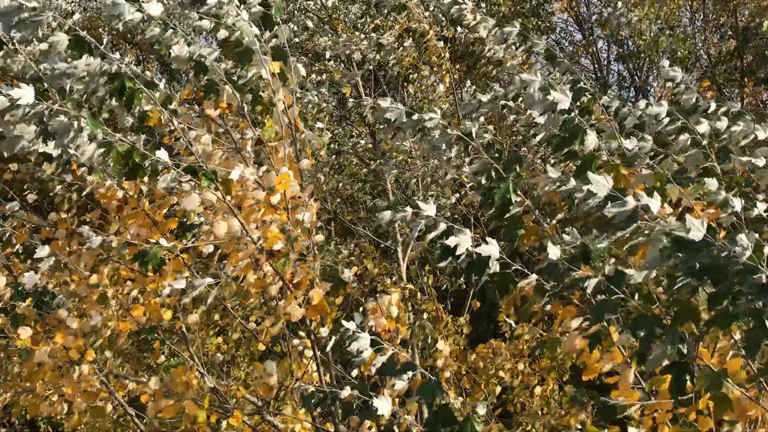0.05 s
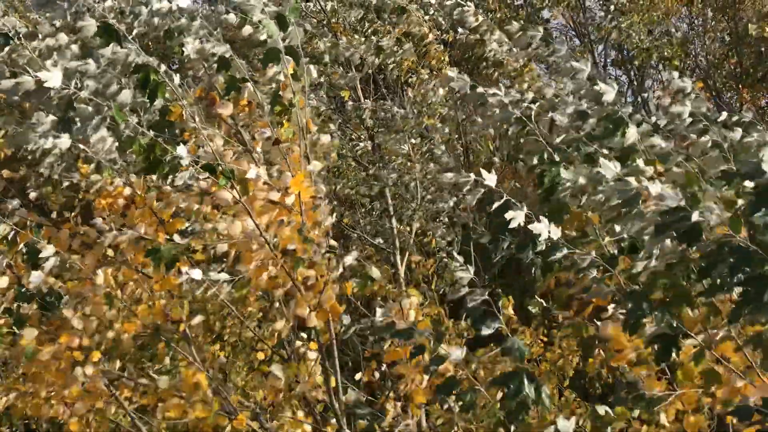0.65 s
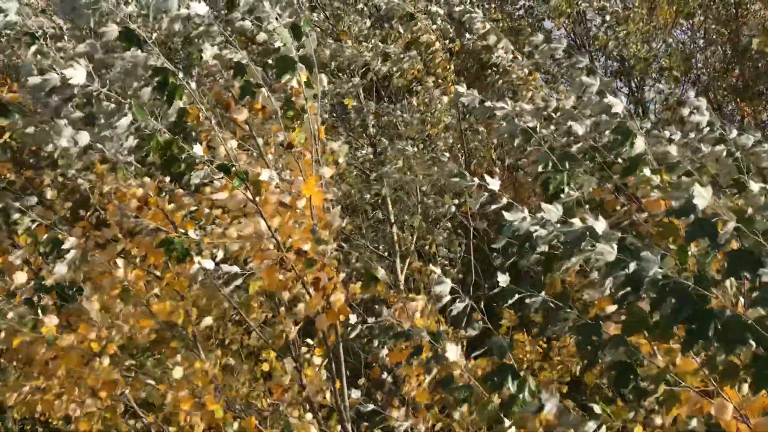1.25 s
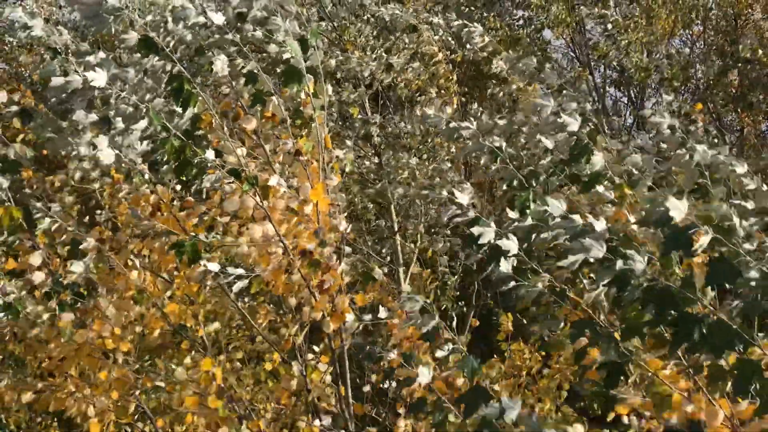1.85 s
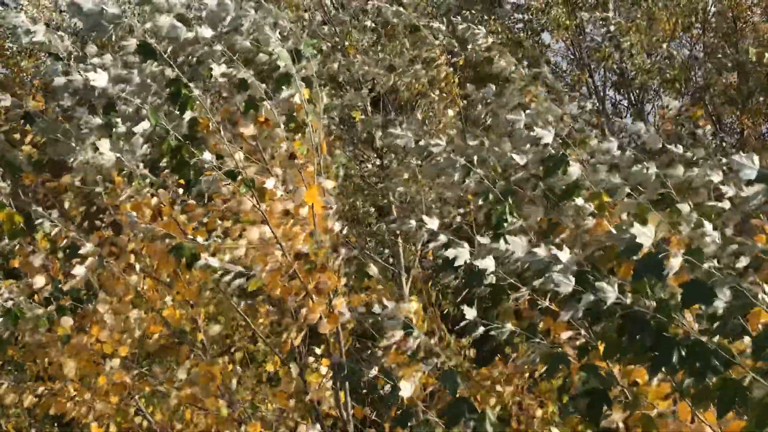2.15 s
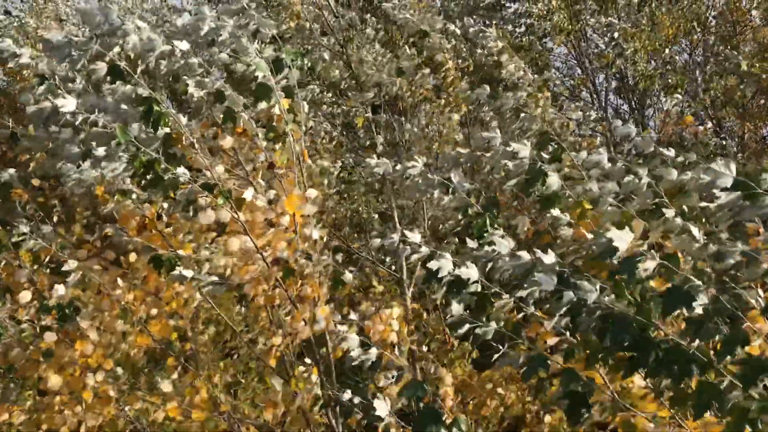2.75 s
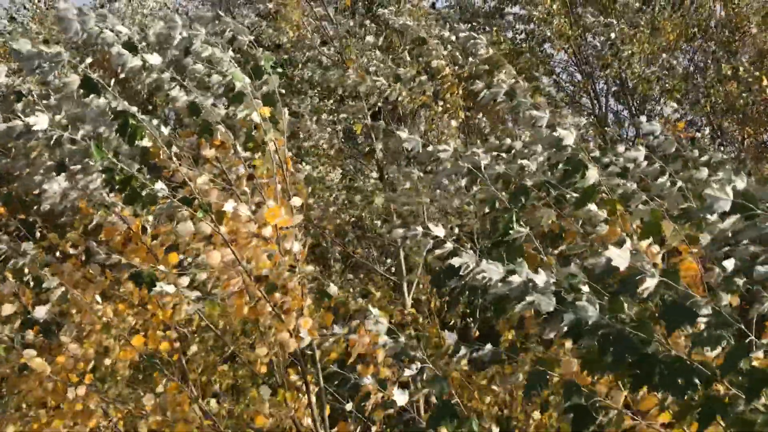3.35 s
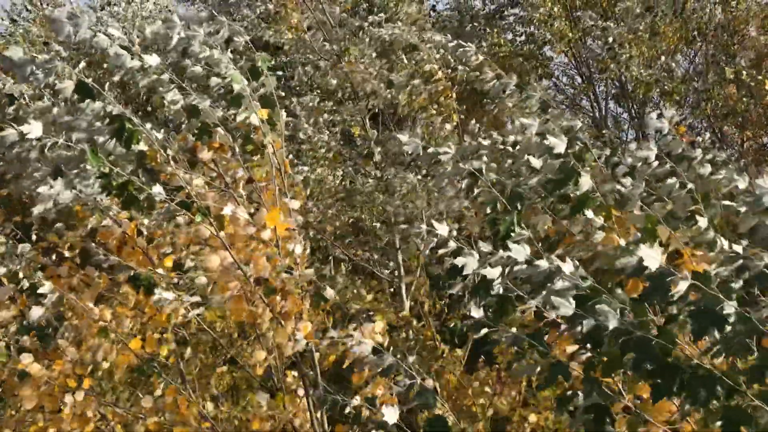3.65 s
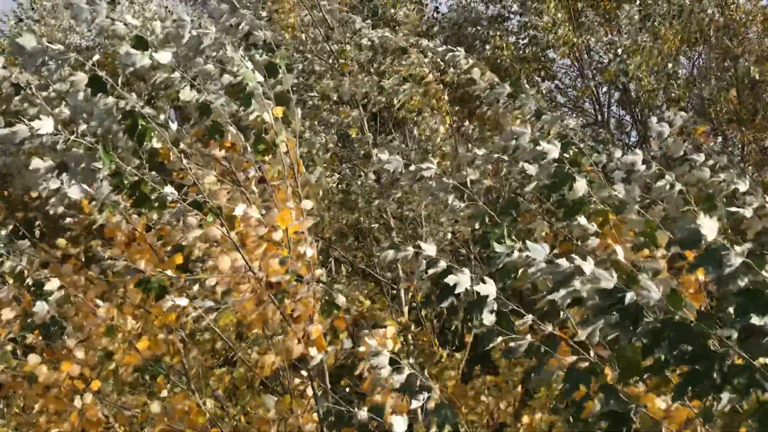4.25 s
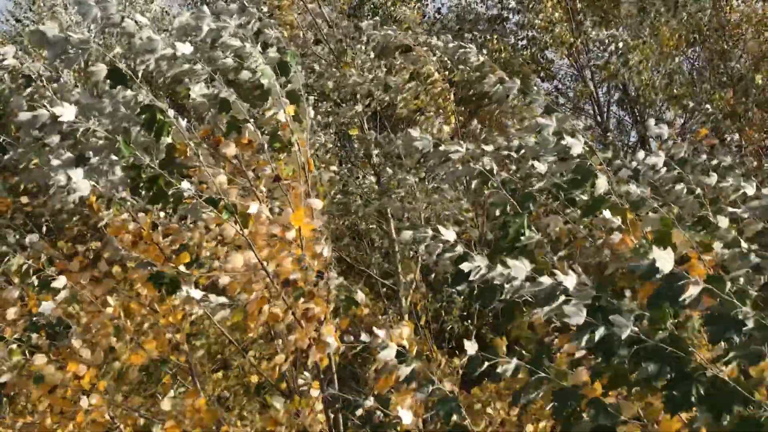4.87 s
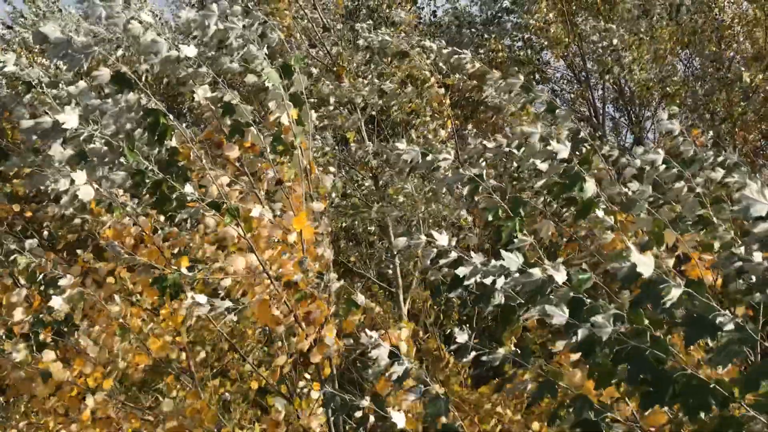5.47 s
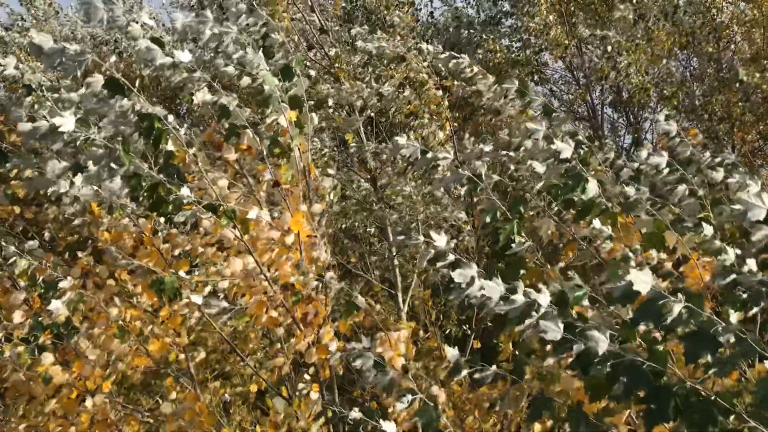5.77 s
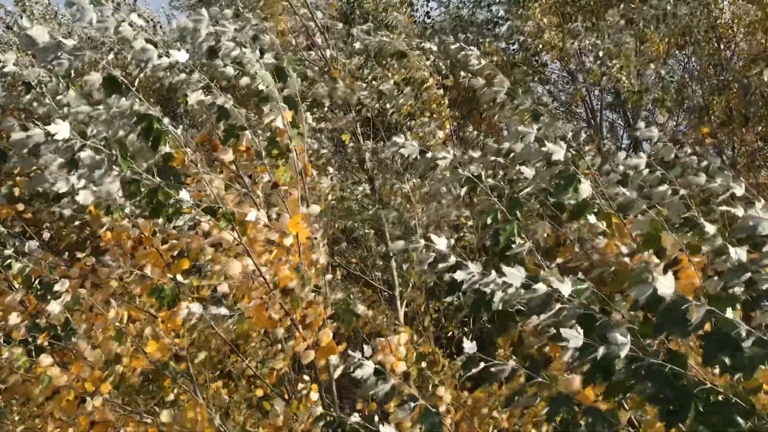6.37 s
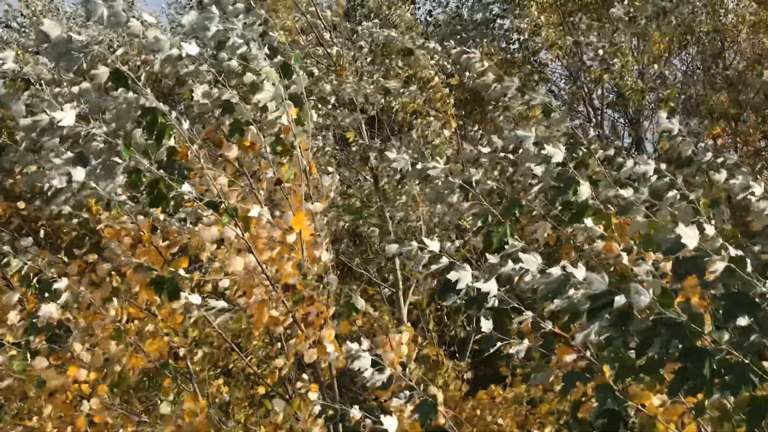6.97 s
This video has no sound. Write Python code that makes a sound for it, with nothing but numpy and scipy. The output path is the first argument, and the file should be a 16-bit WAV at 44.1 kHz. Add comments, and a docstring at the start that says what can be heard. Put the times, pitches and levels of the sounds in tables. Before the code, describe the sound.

Wind blows through a dense stand of autumn trees. Far treetops make a hollow roar, nearer branches swish, and close leaves rustle with occasional soft flaps and tiny dry ticks. Throughout, air buffets the single microphone with a low rumble and frequent short, dull puffs. In the last couple of seconds the wind swells, and the rustling and flapping grow louder.

```python
"""In a dense stand of autumn trees, the wind blows and swells towards the end.
Far treetops roar, nearer branches swish and flap their leaves, and close leaves patter and tick
as they touch. Swirls of air (eddies) hit the one microphone with a low rumble and short, dull puffs.
In the hardest gust there is a brief, bright fizz and two faint chirps."""
import sys
import numpy as np
from scipy import signal
from scipy.fft import rfft, irfft, next_fast_len
from scipy.io import wavfile
from scipy.ndimage import uniform_filter1d, map_coordinates

SR = 44100
rng = np.random.default_rng(int(sys.argv[2]) if len(sys.argv) > 2 else 0)


def to_wav(s):
    """Save 16-bit WAV."""
    ch = np.atleast_2d(s).T  # columns
    pcm = np.round(np.clip(ch, -1, 1) * 32767)  # PCM
    wavfile.write(sys.argv[1], SR, pcm.astype(np.int16))


N = 313992
T = np.arange(N) / SR


def amp(db):
    """Turn decibels into a number to multiply by."""
    return 10 ** (np.asarray(db) / 20)


def unit(x):
    """Scale x so that its average strength (rms) is 1."""
    return x / np.sqrt(np.mean(x ** 2) + 1e-20)


def curves(rows):
    """Join a table's points with straight lines: one curve for each column after the time."""
    times, *columns = np.transpose(rows)
    return [np.interp(T, times, column) for column in columns]


def wobble(rate):
    """A smooth curve through random values, `rate` of them a second."""
    return map_coordinates(rng.standard_normal(4096), [T * rate], mode="wrap")


def filtered(x, response):
    """Turn each frequency in x up or down by response(hz)."""
    size = next_fast_len(len(x) + 8192)
    return irfft(rfft(x, size) * response(np.fft.rfftfreq(size, 1 / SR)), size)[:len(x)]


def coloured(x, tone):
    """Give x the tone of an (f/Hz, level/dB) table, at strength 1."""
    freqs, db = np.transpose(tone)
    return unit(filtered(x, lambda hz: amp(np.interp(np.log(hz + 1), np.log(freqs), db))))


def band(x, centre_hz, octaves):
    """Keep the part of x near one pitch; `octaves` sets how wide that part is."""
    return filtered(x, lambda hz: np.exp(-.5 * (np.log2((hz + 1) / centre_hz) / octaves) ** 2))


def rush(patchy_db, size=512):
    """Noise with louder and softer patches across time and pitch."""
    grid = signal.stft(rng.standard_normal(N), nperseg=size)[2]
    patches = uniform_filter1d(rng.standard_normal(grid.shape), size=5, axis=0)
    patches = uniform_filter1d(patches, size=16, axis=1)
    return unit(signal.istft(grid * amp(patchy_db * unit(patches)), nperseg=size)[1][:N])


def add(track, start_s, sound):
    """Mix a sound into the track from start_s on."""
    part = track[max(round(start_s * SR), 0):][:len(sound)]
    part += sound[:len(part)]


def by_chance(level_db, rate, over_db, scatter_db):
    """Random events (t/s, level/dB), about `rate` a second, louder when the wind is stronger."""
    when, dice = rng.random((2, 256))
    size = np.clip(rng.standard_normal(len(when)), -2, 2)
    db = level_db[(when * N).astype(int)] + over_db + scatter_db * size
    return np.column_stack([when * T[-1], db])[dice < rate * T[-1] / len(when)]


# Tone of the far roar: f/Hz, level/dB
TREETOP_TONE = [(100, -38), (190, -5.5), (255, 1), (340, -3), (420, -1), (520, 0), (660, 4), (800, 0.5),
                (1020, -3), (1300, -18), (2000, -41.5), (4000, -63)]
def treetops(level_db):
    """Many far treetops blend into one hollow roar."""
    sway_db = 0.6 * wobble(9)
    return amp(level_db + sway_db) * coloured(rush(patchy_db=1.26), TREETOP_TONE)


# Tone of the swishing branches: f/Hz, level/dB
BRANCH_TONE = [(400, -53), (800, 0.5), (1050, 5.5), (1300, 2), (1650, -4), (2000, -11.5), (2500, -20),
               (5000, -37), (10000, -66)]
def branches(level_db, air_db):
    """Nearer branches swish; their broad leaves flutter more as the air close by gets rougher."""
    swish = coloured(rush(patchy_db=-1.0), BRANCH_TONE)
    bursts = amp(6.4 * np.tanh(wobble(70)))
    flutter = coloured(bursts * rng.standard_normal(N), BRANCH_TONE)
    flutter_share = np.clip(0.28 + 0.05 * (air_db - np.mean(air_db)), 0, 1)
    blend = np.sqrt(1 - flutter_share) * swish + np.sqrt(flutter_share) * flutter
    return amp(level_db + 0.24 * wobble(14)) * blend


def rustle(level_db, tone, rate, patter_db, hiss_db):
    """Countless leaves brush into a hiss and some patter above it; more wind makes more of them touch."""
    touches_per_s = rate * amp(level_db - np.mean(level_db) + 3.6 * wobble(14))
    touches = rng.random(N) < touches_per_s / SR
    strength = amp(2.5 * np.clip(rng.standard_normal(N), -2, 2))
    clicks = unit(touches * strength * np.sign(rng.standard_normal(N)))
    patter = coloured(clicks, tone)
    hiss = coloured(rush(patchy_db=1.04), tone)
    return amp(level_db + 0.3 * wobble(12)) * (amp(hiss_db) * hiss + amp(patter_db) * patter)


# Gusts in the leaves a little way off: t/s, level/dB
MIDDLE_LEAF_GUSTS = [(0.05, -54.5), (1.0, -54), (1.85, -52), (2.25, -52), (2.62, -50.5), (3.0, -57.5),
                     (3.7, -57), (4.4, -55.5), (5.1, -55), (5.45, -49), (5.85, -53), (6.1, -49.3),
                     (6.3, -48), (6.47, -47.5), (6.66, -47), (6.8, -48.5), (7.12, -52.5)]
# Tone of their rustle: f/Hz, level/dB
MIDDLE_LEAF_TONE = [(900, -12.5), (1700, 8.5), (2200, 2), (2550, 2), (3000, -7), (3600, -5.5),
                    (4400, -12.5), (6000, -17.5), (12000, -37)]
def middle_leaves():
    """The leaves between the branches and the closest leaves rustle in gusts of their own."""
    gust_db, = curves(MIDDLE_LEAF_GUSTS)
    return rustle(gust_db, MIDDLE_LEAF_TONE, rate=600, patter_db=-4.0, hiss_db=-0.5)


# Tone of the closest rustle: f/Hz, level/dB
CLOSE_LEAF_TONE = [(1500, -9), (3000, 6), (4000, 3.5), (4450, 3), (4900, -2.5), (5400, -1.5), (6800, -5.5),
                   (7700, -12.5), (8600, -11.5), (9700, -15.5), (10400, -25), (11300, -23.5), (16000, -36)]
def close_leaves(leaves_db):
    """The closest leaves brush together in a brighter, smoother rustle."""
    return rustle(leaves_db, CLOSE_LEAF_TONE, rate=580, patter_db=-7, hiss_db=1.26)


# Tone of the wind on the microphone: f/Hz, level/dB
RUMBLE_TONE = [(15, -41), (27, -37), (39, 1), (68, 2), (110, -4), (180, -8.5), (260, -11.5), (350, -31),
               (800, -49), (2000, -77)]
def rumble(air_db, over_db=6):
    """Rough air pushes on the microphone in lumps and makes a low rumble."""
    lumps = amp(4.1 * np.tanh(wobble(22)))
    return amp(air_db + over_db) * coloured(lumps * rng.standard_normal(N), RUMBLE_TONE)


def shivers(leaves_db, per_second=30, spread_s=0.012, low_hz=5000, high_hz=12000, over_db=-18.5):
    """Sprigs of leaves shiver for an instant; their tiny touches blur into a hiss, each at its own pitch."""
    out, t = np.zeros(N), np.arange(-SR // 20, SR // 20) / SR
    for when, pitch, strength in rng.random((round(per_second * T[-1]), 3)):
        burst = rng.standard_normal(len(t)) / np.cosh(t / spread_s)
        hz = np.interp(pitch, [0, 1], [low_hz, high_hz])
        shiver = unit(band(burst, hz, octaves=0.16))
        add(out, when * T[-1], strength * low_hz / hz * shiver)  # higher ones are softer
    return amp(leaves_db + over_db) * unit(out)


# Dry leaves that tick close by, among fainter random ticks: t/s, level/dB, f/Hz
LEAF_TICKS = [(2.221, -52, 7200), (2.2595, -45, 4400), (2.9354, -40, 3000), (3.0965, -46, 4600),
              (3.958, -42, 3000), (3.9875, -48, 5220), (4.0835, -41, 3100), (4.1327, -46, 4500),
              (5.483, -55, 6500), (6.175, -42, 3600)]
def ticks(leaves_db):
    """A dry leaf edge hits a twig with a tiny, bright crack, then rings briefly with hardly any pitch."""
    out, t = np.zeros(N), np.arange(-SR // 100, SR // 20) / SR

    def snap(hz, fade_s):
        """A burst of noise near one pitch that fades by 60 dB in fade_s."""
        fade = (t >= 0) * amp(-60 * np.abs(t) / fade_s)
        burst = band(fade * rng.standard_normal(len(t)), hz, octaves=0.5)
        return burst / np.abs(burst).max()

    chance = by_chance(leaves_db, rate=8.2, over_db=4.6, scatter_db=1.0)
    faint = [(s, db, 5200 * 2 ** rng.normal(0, 0.27)) for s, db in chance]
    for s, db, hz in [*LEAF_TICKS, *faint]:
        ring = snap(hz, fade_s=0.022)
        crack = snap(1.9 * hz, fade_s=0.006)
        add(out, s + t[0], amp(db) * (ring + amp(-14.0) * crack))
    return out


def eddy(t, hz, spread_s, octaves):
    """One swirl of air: noise that swells to a strength of about 1 at t = 0 and dies away."""
    shape = 1 / np.cosh(t / spread_s)
    swell = band(shape * rng.standard_normal(len(t)), hz, octaves)
    return swell * np.linalg.norm(shape) / np.linalg.norm(swell)


# The strongest eddies that hit the microphone: t/s, level/dB, f/Hz, time spread/s
STRONG_EDDIES = [(0.559, -29, 84, 0.0049), (0.695, -23, 114, 0.0071), (0.942, -26, 100, 0.0066),
                 (0.979, -29, 79, 0.0076), (1.243, -21.5, 88.5, 0.0035), (1.471, -22.5, 60, 0.0033),
                 (1.576, -22.5, 127, 0.01), (1.7207, -21.5, 234, 0.0022), (1.926, -23.5, 194, 0.0033),
                 (1.978, -20, 84, 0.016), (2.454, -29, 152, 0.021), (2.599, -27.5, 85, 0.014),
                 (2.690, -22, 159, 0.0071), (2.730, -24, 160, 0.0049), (2.836, -30.5, 94, 0.0068),
                 (2.964, -20.5, 212, 0.0023), (3.008, -20, 250, 0.0075), (3.035, -16.5, 80, 0.0096),
                 (3.187, -23, 215, 0.0065), (3.222, -27, 85, 0.006), (3.455, -19, 81, 0.0032),
                 (3.600, -24, 100, 0.013), (3.968, -27, 126, 0.015), (4.176, -23.5, 115, 0.0075),
                 (4.338, -19.5, 74.5, 0.0096), (4.501, -20.5, 182, 0.0035), (4.700, -23.5, 75, 0.0057),
                 (4.801, -26, 103, 0.0099), (5.010, -25, 77, 0.01), (5.266, -18.5, 95, 0.0024),
                 (5.454, -21.5, 133, 0.0012), (5.670, -28, 125, 0.0021), (5.885, -25.5, 68.5, 0.011),
                 (5.972, -22, 135, 0.016), (6.17, -18.5, 121, 0.0047), (6.403, -20.5, 72.6, 0.012),
                 (6.561, -20, 221, 0.0043), (6.569, -16.5, 95, 0.0057), (6.727, -20, 94.5, 0.0063),
                 (6.840, -22.5, 84, 0.0086), (7.003, -23, 80.5, 0.017)]
def puffs(air_db, weak_hz=127, weak_cycles=0.31):
    """An eddy hits with a bright front and a pressure spike, passes as a dull swell and breaks up."""
    out, t = np.zeros(N), np.arange(-SR // 10, SR // 10) / SR
    chance = by_chance(air_db, rate=3.5, over_db=9.9, scatter_db=2.2)
    weak = [(s, db, weak_hz, weak_cycles / weak_hz) for s, db in chance]
    for s, db, hz, spread_s in [*STRONG_EDDIES, *weak]:
        speed = np.log2(hz / 150)  # slow, large eddies have a weak front and spike
        body = amp(-3.0) * eddy(t - 0.002, hz * 0.71, 1.48 * spread_s, octaves=0.77)
        front = amp(5.8 * speed - 7.5) * eddy(t + 0.00028, hz * 1.28, 0.85 * spread_s, octaves=0.88)
        phase = 2 * np.pi * hz * t
        spike = amp(2.5 + 5 * speed) * (1 - phase ** 2) / (1 + phase ** 2) ** 2
        add(out, s + t[0], amp(db) * (body + front + spike))
        for offset_s in rng.normal(0, 0.016, size=2):  # two smaller, faster swirls break off
            shred = eddy(t, hz=265, spread_s=0.0015, octaves=0.68)
            add(out, s + t[0] + offset_s, amp(db - 12.5) * shred)
    return out


# Leaves that flap, the small ones higher and shorter: t/s, level/dB, f/Hz
LEAF_FLAPS = [(0.475, -23.5, 670), (1.959, -22, 760), (1.964, -34, 1690), (2.863, -29, 1150),
              (3.121, -38, 1700), (4.045, -25.5, 750), (4.354, -38, 1600), (4.478, -37, 740),
              (4.712, -31, 1540), (5.075, -36, 1800), (5.873, -27, 900), (6.414, -20.5, 980),
              (6.546, -19.5, 674), (6.818, -27, 1490), (6.890, -25, 1140), (6.929, -33, 1450),
              (6.974, -32, 1690), (7.054, -32, 1500)]
def flaps(rise_cycles=5.9, fade_cycles=24):
    """A leaf flips over with a soft slap that dies within a few dozen vibrations."""
    out, t = np.zeros(N), np.arange(SR // 10) / SR
    for s, db, hz in LEAF_FLAPS:
        rise = 1 - np.exp(-t * hz / rise_cycles)
        fade = amp(-60 * t * hz / fade_cycles)
        slap = rise * fade * band(rng.standard_normal(len(t)), hz, octaves=0.37)
        add(out, s, amp(db) * slap / np.abs(slap).max())
    return out


# Tone of the bright fizz: f/Hz, level/dB
FIZZ_TONE = [(4500, -20), (6000, -3), (9000, -3), (14000, 0), (16000, -1)]
def treble_fizz(start_s=6.54, length_s=0.1, level_db=-69):
    """A brief, faint, bright fizz in the hardest gust."""
    arch = np.sin(np.pi * np.clip((T - start_s) / length_s, 0, 1))
    return amp(level_db) * arch * coloured(rng.standard_normal(N), FIZZ_TONE)


# Faint chirps in the hardest gust: t/s, length/s, f/Hz, level/dB
FAINT_CHIRPS = [(6.553, 0.075, 6000, -63), (6.63, 0.17, 4570, -62.5)]
def chirps():
    """Thin, slightly unsteady whistles, barely heard in the rustle."""
    out = np.zeros(N)
    for s, length_s, hz, db in FAINT_CHIRPS:
        progress = np.clip((T - s) / length_s, 0, 1)
        arch = 2 * np.sqrt(progress * (1 - progress))
        pitch_hz = hz + 70 * wobble(250)
        out += amp(db) * arch * np.sin(2 * np.pi * np.cumsum(pitch_hz) / SR)
    return out


# Wind in the trees: t/s, level/dB at the treetops, level/dB at the branches, level/dB at close leaves
TREE_WIND = [(0.05, -38.5, -46, -56.5), (0.5, -40, -45.5, -57), (0.85, -40.5, -46.5, -57.5),
             (1.25, -40, -45.5, -59), (1.57, -39.5, -42.5, -57.5), (2.14, -36, -47.5, -58.5),
             (2.68, -38.5, -46, -55), (3.1, -37, -48, -56), (3.75, -40.5, -46.5, -56),
             (5.0, -41.5, -46, -56.5), (5.35, -41.5, -45.5, -56), (5.62, -38, -40.5, -57),
             (5.92, -38.5, -45.3, -55), (6.35, -35.5, -45, -55.5), (6.72, -36.5, -47.5, -55),
             (6.92, -35, -46, -53), (7.12, -35.5, -43.5, -55.5)]
# Wind at the microphone: t/s, level/dB
MICROPHONE_WIND = [(0.05, -43), (1.45, -42), (1.8, -40.5), (2.25, -38.5), (3.0, -36.5), (3.3, -39.5),
                   (3.78, -40.5), (4.16, -37), (4.89, -38.5), (5.5, -41), (5.9, -36), (6.5, -40.5),
                   (7.12, -37.5)]
def scene():
    """Trees from far to near, plus air on the microphone; each follows the wind where it stands."""
    far_db, branch_db, near_db = curves(TREE_WIND)
    air_db, = curves(MICROPHONE_WIND)
    leaves_db = near_db - 4
    trees = treetops(far_db + 2) + branches(branch_db + 3.5, air_db)
    rustling = middle_leaves() + close_leaves(leaves_db)
    buffeting = rumble(air_db) + puffs(air_db)
    single_leaves = flaps() + ticks(leaves_db) + shivers(leaves_db)
    return (trees + rustling + buffeting + single_leaves + treble_fizz() + chirps())[None]


# Tone of the microphone's own hiss: f/Hz, level/dB
HISS_TONE = [(1000, 6), (9000, 6), (10400, -0.5), (11500, 6.5), (16000, 1)]
def record(dry, start_s=0.036, bass_hz=32.2, top_hz=15750):
    """The microphone adds a faint hiss, turns on after a moment and drops the lowest and highest sounds."""
    hiss = amp(-73.5) * coloured(rng.standard_normal(N), HISS_TONE)
    heard = filtered(dry[0] + hiss, lambda hz: hz ** 4 / np.hypot(hz ** 4, bass_hz ** 4))
    return filtered(heard * (T > start_s), lambda hz: hz < top_hz)[None]


dry = scene()
out = record(dry)
to_wav(out)
```